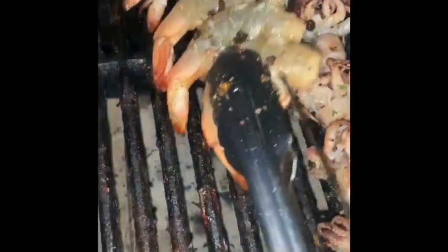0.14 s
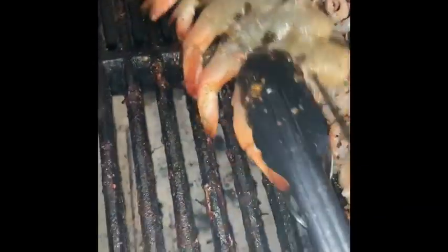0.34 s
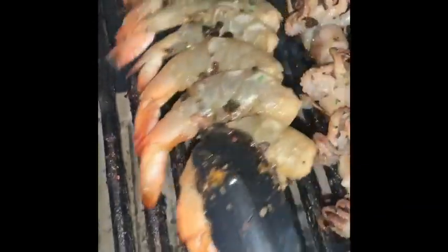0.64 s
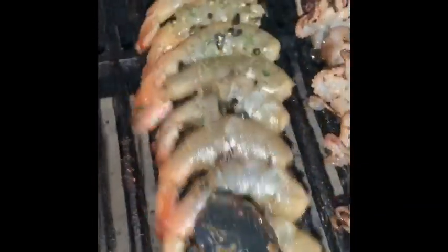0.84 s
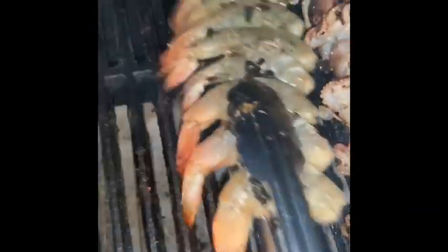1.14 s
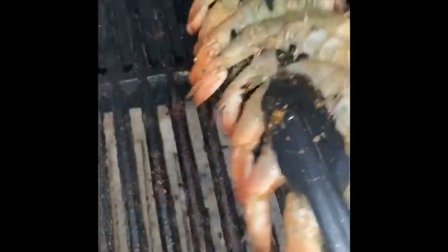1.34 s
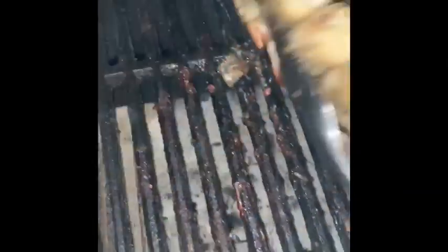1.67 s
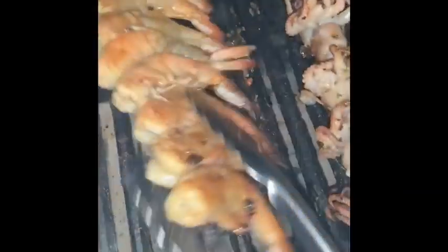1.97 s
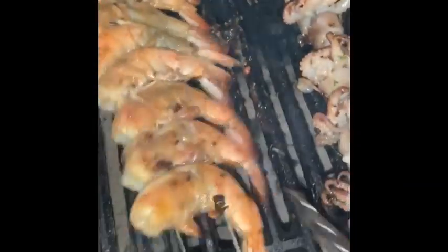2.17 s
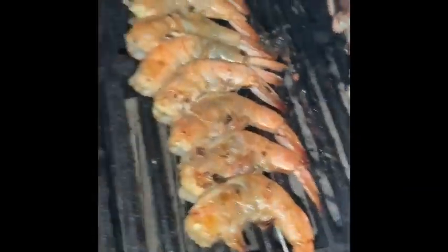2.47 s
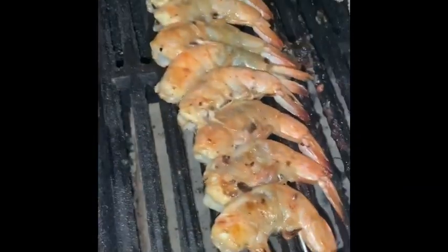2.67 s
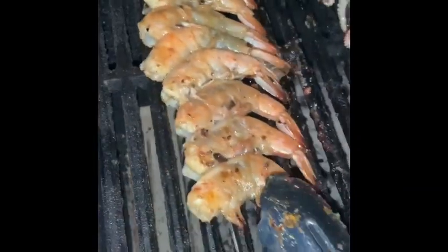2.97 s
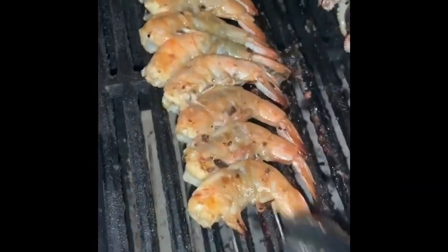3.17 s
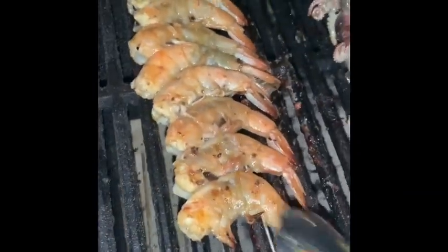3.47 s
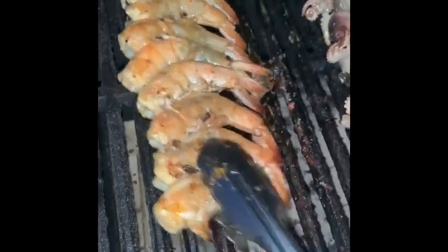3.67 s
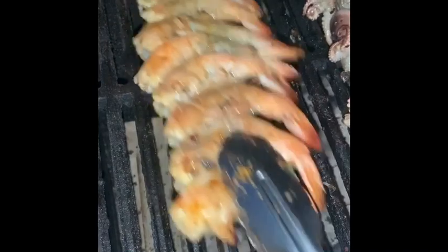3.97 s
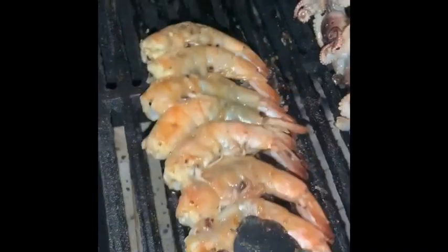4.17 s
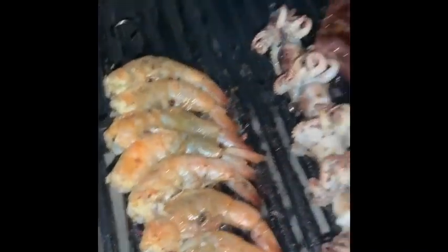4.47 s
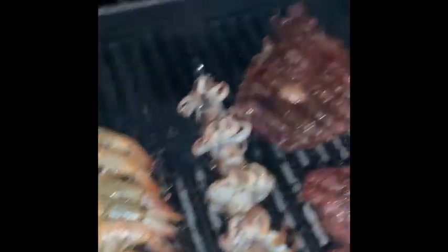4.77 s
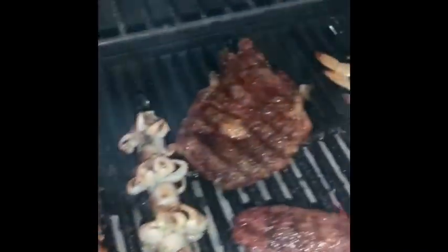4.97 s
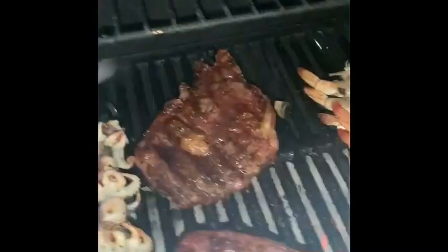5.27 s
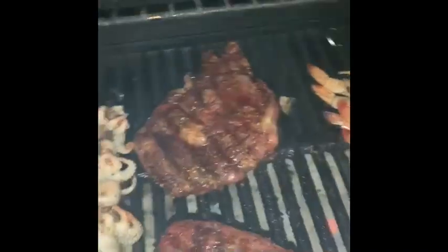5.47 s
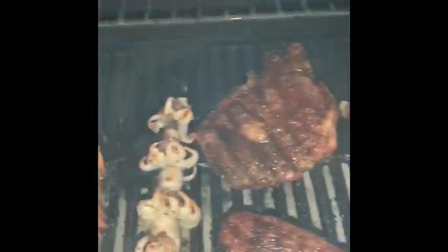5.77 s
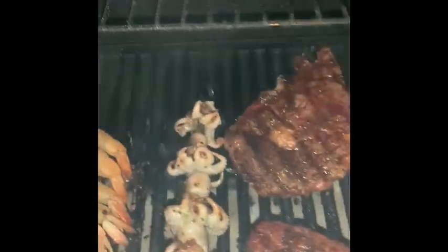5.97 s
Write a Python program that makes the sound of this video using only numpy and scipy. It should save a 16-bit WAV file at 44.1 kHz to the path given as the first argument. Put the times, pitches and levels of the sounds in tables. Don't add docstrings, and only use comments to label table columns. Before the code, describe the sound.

Shrimp and meat sizzle densely on an outdoor grill over low burner rumble and light wind. Steel tongs clack sharply near the start, then scrape and bang the grate, which booms and rings. Busy clatter returns around two seconds and again past three and four, easing into sizzle with one late clang and a final dull knock. Captured close on a phone in stereo, slightly saturated on the hardest hits.

```python
import sys
import numpy as np
from scipy import signal
from scipy.fft import rfft, irfft, next_fast_len
from scipy.io import wavfile
from scipy.ndimage import uniform_filter1d, map_coordinates

SR = 44100
rng = np.random.default_rng(int(sys.argv[2]) if len(sys.argv) > 2 else 0)


def volts_from_db(level):
    exponent = np.asarray(level, float) / 20
    return 10 ** exponent


def transcribe(signal):
    frames = np.atleast_2d(signal).T
    limited = np.clip(frames, -1, 1)
    pcm = np.round(limited * 32767).astype(np.int16)
    wavfile.write(sys.argv[1], SR, pcm)


N = 269773

# (frequency [Hz], level [dB])
WIND = [(22, -36), (38, 4), (55, -4.5), (75, 5.5), (130, -31)]
# (time [s], length [s], level [dB])
GUSTS = [
    (-.1, 0.39, -62),
    (2.01, 0.56, -34),
    (2.76, 0.28, -54),
    (3.3, 0.33, -48),
    (3.556, 0.37, -40),
    (4.2, 0.99, -43),
    (4.982, 0.43, -33),
    (5.14, 0.44, -32),
    (5.425, 0.61, -35),
    (5.988, 0.2, -48),
]
BREEZE_DB, GUST_RISE = -64, 0.14
# (frequency [Hz], level [dB])
RUMBLE = [(50, -59), (80, -14), (110, 3), (160, 6), (220, -15.5), (400, -59)]
# (frequency [Hz], level [dB])
ROAR = [(120, 3.5), (200, -2.5), (320, 4), (550, -3), (800, -1), (1200, -28)]
# (time [s], level [dB])
FLAME = [(0.0, -36), (0.47, -36.5), (0.83, -33.5), (1.74, -37), (2.04, -32), (2.3, -38.5), (2.55, -39),
         (2.73, -34), (3.29, -37.5), (3.49, -36), (3.73, -36.5), (4.46, -41), (5.62, -42), (6.12, -45)]
RUMBLE_DB, RUMBLE_GROWS = -46.5, 0.34
# (time [s], length [s], flutter level [dB], rustle level [dB])
BUFFET = [
    (6.2, .17, -58, -36),
    (5.14, .05, -50, -45),
    (5.19, 0.1, -36.5, -36),
    (4.5, 0.05, -39, -52),
    (1.39, 0.47, -67, -44.5),
    (2.15, 0.18, -35, -44),
    (2.4, 0.091, -50, -28.5),
    (1.9, 0.18, -41, -38.5),
    (4.0, 0.09, -57, -42),
]
# (frequency [Hz], level [dB])
RUSTLE = [(150, -37), (300, -4), (500, 3), (750, -4), (1100, -36)]

# (frequency [Hz], level [dB])
FIZZ = [(1500, -30), (3000, -8.5), (4200, -9.5), (5500, 0.5), (8000, 2), (11000, 3.5), (15700, 5.5)]
# (frequency [Hz], level [dB])
SIMMER = [(300, -81), (700, 1.5), (1200, 2), (2000, 1), (2800, -2), (4000, 4.5), (6000, -20.5)]
# (time [s], level [dB])
BOIL = [(0.0, -28), (0.36, -29.5), (0.66, -26.5), (0.8, -29), (1.04, -28), (1.17, -25.5), (1.48, -30),
        (1.81, -27), (1.91, -30), (2.03, -27.5), (2.45, -24.5), (3.49, -26.5), (3.78, -27), (4.6, -24),
        (4.92, -27), (5.57, -28), (5.98, -30.5), (6.12, -27.5)]
SIMMER_DB, SIMMER_GROWS = -39, 0.54
# (time [s], peak [dB], pitch [Hz])
SPARK = [(.3958, -15, 11000), (1.7357, -11, 6600), (3.695, -6, 12500), (3.7215, -5, 12000),
         (3.8797, -14, 11500), (3.9598, -12, 12000), (4.5455, -6, 11500), (4.5545, -9, 11500),
         (5.209, -16, 11000), (2.409, -14, 10500), (3.473, -9, 5600), (3.508, -8, 6500),
         (5.5243, -16, 10900), (5.6275, -14, 11100), (5.9787, -17, 11100)]
SPARK_S = .00022
# (time [s], peak [dB], t60 [s])
POP = [
    (2.3094, -23, 0.054),
    (2.331, -20, 0.028),
    (2.4527, -16, 0.024),
    (3.9287, -17.5, 0.041),
    (3.98, -24, 0.077),
    (4.009, -22.5, 0.082),
    (4.079, -20, 0.024),
    (5.58, -20, 0.03),
]
POP_HZ, POP_BODY_DB, POP_SNAP_DB = 7100, -7, 4

# (time [s], length [s], level [dB])
DRAG = (0.562, 0.17, -25.5)
# (frequency [Hz], level [dB])
DRAG_BODY = [(200, -30), (330, -5), (430, 9.5), (700, -8.5), (1300, -15), (2300, -5.5), (4500, -13),
             (7000, -29)]
DRAG_LEAD = 1.4

# (frequency [Hz], t60 [s])
GRATE = [
    (148, 0.26),
    (241, 1.8),
    (323, 0.13),
]
# (frequency [Hz], level [dB], t60 [s])
BARS = [(410.6, 11.5, 0.13), (460, 8.5, 0.21), (711, -5, 0.28), (985, 3, 0.38), (561, 1, 0.24),
        (783, 6.5, 0.43), (1143, 6, 0.19), (1364, 9.5, 0.044), (1460, 6, 0.3), (1647, -3, 0.55),
        (2010, 6, 0.22), (2326, 6.5, 0.22)]
# (time [s], boom [dB], hum [dB], drum [dB], clang [dB])
KNOCK = [(0.637, -29.5, -75, -41, -42), (.812, -18.5, -31, -23, -23), (1.12, -30, -42.5, -46, -36),
         (1.898, -24, -50, -61, -49), (2.048, -24, -66, -33, -23), (2.543, -15.5, -37, -28, -33.5),
         (2.657, -15, -31, -18.5, -24), (2.688, -58, -33, -37, -34), (3.29, -21, -28.5, -20.5, -25.5),
         (3.304, -17, -34, -32, -36), (3.45, -36, -58, -53, -50), (3.347, -58, -36, -24.5, -45),
         (3.39, -23, -69, -25, -29.5), (3.47, -45, -64, -28.5, -40), (3.579, -23.5, -61, -32, -57),
         (3.614, -55, -70, -30.5, -50), (3.65, -52, -64, -34, -59), (3.687, -49, -49.5, -48, -58),
         (0.584, -45, -65, -58, -38), (1.957, -28, -62, -27, -37), (4.203, -21.5, -28, -18, -38),
         (6.076, -31, -29, -18, -29)]
# (time [s], level [dB])
MUTE = [
    (3.6, -14.5),
]
# (frequency [Hz], level [dB])
THUMP = [(120, -15), (200, 5.5), (350, -4.5), (600, -11.5), (1000, -8.5), (1800, -18), (3000, -47)]
# (time [s], frequency [Hz], level [dB], t60 [s])
RING = [(.812, 1160, -19, 0.29), (.812, 1380, -23, .1), (.812, 1900, -19, 0.15), (.812, 2342, -33, 0.11),
        (.812, 790, -30, 0.18), (2.062, 368, -17.5, 0.19), (2.655, 1663, -23.5, 0.44),
        (2.655, 367, -19, 0.21), (2.655, 614, -12, 0.12), (2.655, 1990, -30, .25), (2.655, 2330, -20, 0.23),
        (2.69, 690, -30, 0.85), (2.69, 793, -40, .9), (3.293, 430, -30, 0.14), (3.3, 834, -30, 0.45),
        (3.43, 783, -27, 0.53), (3.61, 760, -28, 0.33), (4.203, 1162, -15.5, 0.19),
        (4.203, 1450, -20.5, 0.095), (4.203, 790, -19.5, .12), (4.21, 880, -21.5, 0.2),
        (4.21, 1933, -28, 0.22), (4.22, 659, -36.5, 0.98), (5.325, 1940, -17, 0.14),
        (5.325, 1580, -26, 0.25), (5.325, 1367, -27, 0.16), (5.325, 3488, -19, 0.19),
        (6.073, 335, -8, 0.12), (6.073, 265, -14, 0.13), (3.575, 300, -24, 0.37), (3.655, 440, -32.5, .2),
        (6.08, 885, -19.5, 0.2), (6.08, 1177, -28, 0.29), (6.08, 1660, -21, 0.075),
        (2.7, 1337, -34.5, 0.69), (2.545, 369, -25, 0.18), (2.72, 771, -31.5, .9)]
RING_RISE_S = 0.0033

# (frequency [Hz], width [Hz], level [dB])
TONGS = [(3312, 55, 1), (3580, 300, -0.5), (4376, 250, 8), (5192, 110, 12.5), (5450, 180, 5.5),
         (5750, 200, 3.5), (6110, 91, -1.5), (6600, 45, 3.5), (7410, 98, 1), (7400, 27, -6), (8400, 340, 1)]
# (frequency [Hz], level [dB])
RASP = [(2000, -6), (3300, -3.5), (4450, -10), (5000, -5), (5600, -2.5), (6110, -1.5), (6700, -6),
        (8300, -2), (15000, -1)]
# (frequency [Hz], level [dB])
BODY = [(500, -15.5), (1000, -11.5), (1900, -3), (3000, 0.5), (4500, -2)]
# (time [s], length [s], rasp level [dB], body level [dB])
SCRAPE = [(0.556, 0.26, -45, -25), (0.8, 0.12, -37.5, -20), (1.702, 0.036, -25.5, -49),
          (1.832, 0.037, -21, -39), (1.932, 0.084, -30.5, -50), (2.025, 0.086, -23, -24.5),
          (2.569, 0.071, -28.5, -30), (2.688, 0.073, -30.5, -22), (3.025, 0.11, -24, -72),
          (3.104, 0.093, -22.5, -67), (3.336, 0.12, -23.5, -26.5), (3.449, 0.17, -20.5, -37),
          (4.151, 0.04, -31.5, -50), (4.191, 0.031, -50, -22), (4.253, 0.081, -30, -39),
          (4.316, 0.076, -23, -44), (5.312, 0.03, -38, -29), (5.355, 0.052, -31, -32),
          (1.078, 0.088, -35, -28.5), (0.824, 0.22, -44, -24.5)]
STROKE_RISE, BODY_RISE = 0.41, 0.29
# (time [s], length [s], level [dB], tone [Hz], body level [dB])
SKID = [(0.786, 0.018, -14, 5130, -9), (0.799, 0.018, -17, 3250, 9), (0.806, .013, -12, 5170, 2),
        (1.771, 0.0046, -10, 6670, -14), (1.714, 0.02, -18, 4330, -28), (1.974, .03, -22, 4530, -30),
        (2.0556, 0.038, -17, 5050, -6), (2.523, 0.0071, -14, 7270, -10), (2.643, 0.0076, -21, 5600, 6),
        (2.65, 0.017, -5.5, 6160, -7), (2.681, 0.0052, -16, 7080, -3), (3.1144, 0.019, -14, 4970, -13),
        (3.465, 0.013, -17, 7600, -5), (3.492, 0.015, -12, 5630, -27), (3.519, .007, -5, 7200, -17),
        (3.529, 0.02, -13, 6700, -32), (3.55, 0.03, -16.5, 6060, -32), (4.3204, 0.014, -11, 5240, -28),
        (4.33, 0.004, -9, 5170, -28.5), (4.3498, 0.017, -16, 6500, -16), (4.365, 0.011, -16, 7360, -20),
        (0.617, 0.087, -27, 4770, -20), (0.707, 0.019, -21, 4370, -29), (.789, 0.036, -9, 4510, -18),
        (2.5294, 0.004, -1.5, 9070, -15), (2.53, 0.0076, -11, 4450, -14), (2.687, 0.0066, -12, 11050, -21),
        (3.113, 0.0027, -19, 7160, -18), (3.166, .006, -20, 6000, -18), (4.186, .012, -19.5, 3230, -10),
        (4.262, 0.06, -26, 5270, -25), (4.293, .004, -19, 5250, -20), (4.31, .005, -21, 4500, -20),
        (4.32, .04, -20, 4670, -25), (4.3437, 0.0056, -3.5, 5150, -32), (2.065, 0.0051, -12, 5200, -3),
        (5.338, 0.0029, -16, 7000, -3), (5.319, 0.0051, -16, 6050, -1), (4.371, 0.0069, -17.5, 3000, -13),
        (4.554, 0.0071, -26, 11600, -4)]
SKID_WIDTH_HZ, SKID_TONE_DB, SKID_GRIP_S, SKID_RELEASE_S = 260, 15.5, 0.0002, 0.017
# (time [s], peak [dB], tone [Hz], body level [dB], t60 [s])
CLACK = [(.1127, 7, 5450, -47, 0.059), (.7847, 6, 5330, -44, 0.047), (.8071, 8.5, 3430, -10.5, 0.036),
         (1.0124, -1, 4350, -47, 0.0093), (1.204, -4, 4350, -50, 0.016), (1.2635, 3.5, 7500, -47, 0.01),
         (1.7665, -0.5, 6550, -25, 0.078), (1.7725, -4, 6600, -43, 0.022), (1.8781, -0.5, 7530, -22, 0.029),
         (2.0135, 2.5, 5830, -24, 0.029), (2.0567, 1, 4900, -47, 0.031), (2.0655, 6.5, 5750, -31, 0.035),
         (2.5286, 0.5, 9100, -22, 0.092), (2.6528, 9.5, 6110, -12.5, 0.042), (2.6868, -7, 7100, -7, 0.046),
         (3.2892, 2, 7100, -16, 0.039), (3.3932, -8.5, 6100, -31, 0.021), (3.5198, -23, 7600, -26, 0.068),
         (4.149, -6, 6100, -43, 0.019), (4.1902, -3, 5500, -34, 0.03), (4.3211, -1, 4800, -45, 0.14),
         (4.3464, 2.5, 6700, -47, 0.083), (5.3255, -2, 3420, -2, 0.028), (5.3414, -6.5, 3400, -7.5, 0.091)]
# (time [s], peak [dB], tone [Hz])
RATTLE = [(1.855, -4.5, 3140), (2.0234, -3.5, 6430), (2.0924, -3, 5860), (2.5937, -7, 5550),
          (2.7016, -7, 7240), (3.063, -9, 7100), (3.1244, -4, 7400), (3.167, -7, 5710), (3.456, -29, 5750),
          (3.469, -19, 7800), (3.49, -5, 5450), (4.5458, -12, 7250), (4.7173, -13, 7300),
          (4.9383, -12, 6450), (5.024, -10.5, 6600), (5.0962, -22, 6440)]
RATTLE_BODY_DB, RATTLE_T60_S = -42, 0.052
# (time [s], peak [dB])
NUDGE = [
    (0.413, -23.5),
    (1.0794, -24.5),
    (3.3466, -18),
    (3.632, -25),
    (3.7963, -16.5),
    (5.459, -18.5),
    (6.078, -20.5),
]
NUDGE_HZ, NUDGE_BODY_DB, NUDGE_T60_S = 6700, -4, 0.067
SNAP_DB, SNAP_SHRINKS = -13, 0.51
STRIKE_DB, SOFT_STRIKE_DB = 14, 3
SOFT_BELOW_DB = -7

# (frequency [Hz], lead [radians])
LEAD = [(100, 0), (500, -.9), (900, -1.7), (1250, -.7), (2300, 1.2), (2750, 3), (3200, 1.5), (4000, 2.3),
        (4750, np.pi)]
LEAD_TURN_HZ = 4170
# (frequency [Hz], likeness [0..1])
ALIKE = [(130, 1), (300, 1), (750, 0.13), (1650, 0.39), (2400, 0.25), (3400, 0.62), (4300, 0.96),
         (16000, 0.97)]
CONTACT_ALIKE = 0.83
CONTACT_PATH = 1
# (time [s], length [s], level [dB])
DIP = [
    (0.843, 0.16, -6),
    (5.35, .13, -4),
    (2.5, 0.16, -2),
]
DIP_FALL = 0.32
BAND_EDGES = [64, 72, 80, 88, 96, 108, 120, 132, 144, 160, 176, 196, 216, 240, 264, 292, *range(320, 736, 32),
              768]


def unit(x):
    return x / np.sqrt(np.mean(x ** 2) + 1e-20)


def along(points, hz):
    f, v = np.transpose(points)
    return np.interp(np.log(hz + 1), np.log(f + 1), v)


def curves(rows):
    s, *cols = np.transpose(rows)
    return [np.interp(np.arange(N) / SR, s, c) for c in cols]


def wobble(rate):
    at = np.arange(0, N + 8, 8)
    knots = rng.standard_normal(int(N * rate / SR) + 4)
    smooth = map_coordinates(knots, [at * rate / SR])
    return np.interp(np.arange(N), at, np.clip(smooth, -2.5, 2.5))


def hump(start_s, length_s, rise, peaky):
    out = np.zeros(N + 2 * SR)
    u = np.linspace(0, 1, max(round(length_s * SR), 2))
    rise = np.clip(rise, .05, .95)
    out[SR + round(start_s * SR):][:len(u)] = np.interp(u, [0, rise, 1], [0, 1, 0]) ** peaky
    return out[SR:][:N]


def filtered(x, response):
    m = next_fast_len(x.shape[-1] + 4096)
    return irfft(rfft(x, m) * response(np.fft.rfftfreq(m, 1 / SR)), m)[..., :x.shape[-1]]


def modes(f, table):
    total = 0
    for k, (centre, width, db) in enumerate(table):
        damping = 1j * f * width
        total = total + (-1) ** k * volts_from_db(db) * damping / (centre * centre - f * f + damping + 1e-9)
    return total


def noise(spectrum, grain_db=0, rate=1000):
    rough = rng.standard_normal((2, N)) * volts_from_db(grain_db * wobble(rate))
    return unit(filtered(rough, lambda hz: volts_from_db(along(spectrum, hz))))


def patchy(x, depth_db):
    z = signal.stft(x, nperseg=512)[2]
    field = uniform_filter1d(rng.standard_normal(z.shape[1:]), size=8, axis=0)
    field = uniform_filter1d(field, size=5, axis=1)
    return unit(signal.istft(z * volts_from_db(depth_db * unit(field)), nperseg=512)[1][:, :N])


def burners():
    roar_db, = curves(FLAME)
    rumble_db = RUMBLE_DB + RUMBLE_GROWS * (roar_db - roar_db.mean())
    wind = volts_from_db(BREEZE_DB + 2.9 * wobble(11))
    for s, length, db in GUSTS:
        wind = wind + volts_from_db(db) * hump(s, length, GUST_RISE, peaky=1.16)
    puff, rustle = np.zeros((2, N))
    for s, length, puff_db, rustle_db in BUFFET:
        draught = hump(s, length, .4, peaky=.7)
        puff += volts_from_db(puff_db) * draught
        rustle += volts_from_db(rustle_db) * draught
    flame = puff + volts_from_db(rumble_db + 5.0 + 0.81 * wobble(4.4))
    low = wind * noise(WIND) + flame * noise(RUMBLE)
    low = low + rustle * noise(RUSTLE, grain_db=7.5, rate=40)
    roar = volts_from_db(roar_db + 1.2 * wobble(12) - 0.72) * noise(ROAR)
    return low + roar


def sizzle():
    fizz_db, = curves(BOIL)
    simmer_db = SIMMER_DB + SIMMER_GROWS * (fizz_db - fizz_db.mean())
    when, size = rng.random((2, 2400))
    spits = np.zeros(N)
    spits[(when * N).astype(int)] = volts_from_db(np.minimum(-5.5 * np.log(size), 16))
    spits = np.convolve(spits, volts_from_db(-60 * np.arange(200) / SR / 0.00093))[:N]
    flow = volts_from_db(fizz_db + 5.0 + 0.085 * wobble(17) + 1.07 * wobble(50) + 0.42 * wobble(160))
    fizz = flow * (1 + .3 * spits) * patchy(noise(FIZZ, grain_db=2, rate=900), depth_db=1.3)
    bubbling = patchy(noise(SIMMER, grain_db=0.0, rate=250), depth_db=3.5)
    return fizz + volts_from_db(simmer_db + 1.3 * wobble(16) + 1.12) * bubbling


def sparks():
    out, t = np.zeros((2, N)), np.arange(-40, 40) / SR
    for s, db, hz in SPARK:
        snap = np.exp(-(t / SPARK_S) ** 2) * np.sin(2 * np.pi * hz * t)
        out[0, round(s * SR) - 40:][:80] += volts_from_db(db + 4) * snap
    return out


def drag():
    s, length_s, db = DRAG
    return volts_from_db(db) * hump(s, length_s, 0.51, peaky=0.78) * noise(DRAG_BODY, grain_db=3, rate=200)


def decaying_tone(hz, t60, turns, t):
    return np.exp(-np.log(1000) * t / t60) * np.sin(2 * np.pi * (hz * t + turns))


def knocks():
    out, t = np.zeros(N + 2 * SR), np.arange(SR) / SR
    short = t[:SR // 4]
    decay = volts_from_db(-60 * t / 0.28) + volts_from_db(-19.5 - 60 * t / 0.89)
    swell = 1 - np.exp(-t / .003)
    for s, *low_db, clang_db in KNOCK:
        drift = .0008 * np.cumsum(rng.standard_normal(SR))
        low_db[1] += sum(db * np.clip((s + t - at) / 0.02, 0, 1) * (s < at) for at, db in MUTE)
        boom = 0
        for level, (hz, t60) in zip(low_db, GRATE):
            boom = boom + volts_from_db(level + 3.0) * decaying_tone(hz, t60, hz * s + drift, t)
        clang = np.zeros(SR)
        for hz, level, t60 in BARS:
            gain, pitch = volts_from_db(level + rng.normal(0, 2)), hz * rng.normal(1, .003)
            turns = rng.random() + .0035 * np.cumsum(rng.standard_normal(len(short)))
            clang[:len(short)] += gain * decaying_tone(pitch, t60, turns, short)
        thump = filtered(decay * rng.standard_normal(SR), lambda hz: volts_from_db(along(THUMP, hz)))
        blow = boom + volts_from_db(clang_db - 11.0) * clang + volts_from_db(low_db[2] + 16.5) * thump
        out[round(s * SR):][:SR] += swell * blow
    return out[:N] * volts_from_db(1.9 * wobble(60) + 1.0 * wobble(11)) * [[1], [-.5]]


def rings():
    out, t = np.zeros((2, N + SR)), np.arange(SR // 2) / SR
    for s, hz, db, t60 in RING:
        turns = rng.random() + .002 * np.cumsum(rng.standard_normal(len(t)))
        envelope = volts_from_db(db - 60 * t / t60) * (1 - np.exp(-t / RING_RISE_S))
        out[0, round(s * SR):][:len(t)] += envelope * np.sin(2 * np.pi * (hz * t + turns))
    return out[:, :N]


def steel(hz):
    return modes(hz, TONGS) + 0.55 * hz / (hz + 3000)


def scrapes():
    rasp, body = np.zeros((2, N))
    for s, length, rasp_db, body_db in SCRAPE:
        rasp += volts_from_db(rasp_db + 6.5) * hump(s, length, STROKE_RISE, peaky=0.47)
        body += volts_from_db(body_db - 5.5) * hump(s, length, BODY_RISE, peaky=1.0)
    slips = volts_from_db(3.5 * wobble(220) + 1.5 * wobble(60))
    chatter = slips * rng.standard_normal((2, N))
    bright = unit(filtered(chatter, lambda hz: steel(hz) * volts_from_db(along(RASP, hz))))
    bars = [(hz, 60, db) for hz, db, t60 in BARS]
    thick = filtered(slips * (noise(BODY) + 0.14 * noise(THUMP)), lambda hz: 0.18 + modes(hz, bars))
    return rasp * bright + body * unit(thick)


def skids():
    out, t = np.zeros((2, N + SR)), np.arange(SR // 10) / SR
    for s, length_s, db, tone_hz, body_db in SKID:
        release = volts_from_db(-60 * np.maximum(t - length_s, 0) / SKID_RELEASE_S)
        grip = (1 - np.exp(-t / SKID_GRIP_S)) * release
        chatter = volts_from_db(3.6 * uniform_filter1d(rng.standard_normal(len(t)), size=40) * np.sqrt(40))

        def colour(hz):
            metal = 0.36 * steel(hz) * volts_from_db(along(RASP, hz))
            tone = modes(hz, [(tone_hz, SKID_WIDTH_HZ, SKID_TONE_DB)])
            return metal + tone + volts_from_db(body_db + 8 + along(BODY, hz)) / (1 + (hz / 4500) ** 4)

        skid = filtered(grip * chatter * rng.standard_normal((2, len(t))), colour)
        out[:, round(s * SR):][:, :len(t)] += volts_from_db(db - 5.5) * skid
    return out[:, :N]


def clacks():
    out, t = np.zeros((2, N + SR)), np.arange(SR // 9) / SR
    metal = list(CLACK)
    metal += [(*row, RATTLE_BODY_DB, RATTLE_T60_S) for row in RATTLE]
    metal += [(*row, NUDGE_HZ, NUDGE_BODY_DB, NUDGE_T60_S) for row in NUDGE]
    contacts = [(*row, SNAP_DB - SNAP_SHRINKS * row[1]) for row in metal]
    contacts += [(s, db, POP_HZ, POP_BODY_DB, t60, POP_SNAP_DB) for s, db, t60 in POP]
    for s, db, tone_hz, body_db, t60, snap_db in contacts:
        hard = db > SOFT_BELOW_DB
        fade = -60 * t / np.clip(t60, .003, .3)
        swell = 1 - np.exp(-t / (0.054 * t60))
        edge = volts_from_db(-60 * t / .008) * (1 - np.exp(-t / .0003))
        shape = 1.3 * volts_from_db(fade) * swell + (.7 if hard else .3) * edge
        burst, thick, thin = rng.standard_normal((3, 2, len(t))) * shape * volts_from_db(-1.5)
        strike = volts_from_db(STRIKE_DB if hard else SOFT_STRIKE_DB) * (np.arange(len(t)) == 8) * [[1], [0]]
        burst, thick, thin = burst + strike, thick + strike, thin + strike
        ring = filtered(burst, lambda hz: steel(hz) / (1 + (hz / 9000) ** 4) + modes(hz, [(tone_hz, 120, 8)]))
        low = filtered(thick, lambda hz: volts_from_db(along(BODY, hz)) * (0.54 + modes(hz, [(1660, 570, 0.93)])))
        snap = filtered(thin * volts_from_db(0.26 * fade), lambda hz: 1 / (1 + (7500 / (hz + 1)) ** 4))
        contact = volts_from_db(-3.0) * ring + volts_from_db(body_db + 10.0) * low + volts_from_db(snap_db + 10.5) * snap
        out[:, round(s * SR) - 8:][:, :len(t)] += volts_from_db(db) * contact
    return out[:, :N]


def ports(pair, closeness, path):
    def lead(hz):
        top, turn = LEAD[-1]
        return np.where(hz < top, along(LEAD, hz), turn + 2 * np.pi * (hz - top) / LEAD_TURN_HZ)

    def split(hz):
        angle = np.arccos(np.clip(closeness * along(ALIKE, hz), 0, 1)) / 2
        return np.array([np.cos(angle), np.sin(angle)])

    same, differ = filtered(pair, split)
    sides = np.array([same + differ, same - differ])
    return filtered(sides, lambda hz: np.exp(.5j * path * lead(hz) * [[1], [-1]]))


def scene():
    spread = burners() + sizzle() + sparks() + knocks() + rings() + scrapes()
    aside = ports(drag(), 1, DRAG_LEAD)
    near = ports(skids() + clacks(), CONTACT_ALIKE, CONTACT_PATH)
    return ports(spread, 0.97, 1) + aside + near


def gain_control(x):
    return x * volts_from_db(sum(db * hump(s, length, DIP_FALL, peaky=0.44) for s, length, db in DIP))


def joint(x, weak_db, attack_db, blur, coarse):
    hop = 1024
    n, k = np.arange(2 * hop), np.arange(hop)
    basis = np.cos(np.pi / hop * np.outer(n + .5 + hop / 2, k + .5)) * np.sqrt(2 / hop)
    basis *= signal.windows.kaiser_bessel_derived(2 * hop, 4 * np.pi)[:, None]
    start = 2 * hop - 855
    pair = np.pad([x[0] + x[1], x[0] - x[1]], ((0, 0), (start, 3 * hop - (start + N) % hop)))
    halves = pair.reshape(2, -1, hop)
    bins = np.concatenate([halves[:, :-1], halves[:, 1:]], axis=2) @ basis
    blocks = (np.diff(pair, prepend=0) ** 2).sum(axis=0).reshape(-1, 128).sum(axis=1)
    jump = blocks / (uniform_filter1d(blocks, size=8, origin=3) + 1e-9)
    sharpest = np.roll(jump, -4)[:-8].reshape(-1, 8).max(axis=1)
    steady, calm = sharpest < volts_from_db(attack_db), sharpest < volts_from_db(attack_db - 3)
    for lo, hi in zip(BAND_EDGES, BAND_EDGES[1:]):
        wavers = lo < 240
        limit_db = weak_db + wavers * 2.5 * uniform_filter1d(rng.normal(0, 2, len(steady)), size=4)
        power = (bins[..., lo:hi] ** 2).sum(axis=2)
        weaker = power < power[::-1] * volts_from_db(2 * limit_db)
        bins[..., lo:hi] *= ~(weaker & steady)[..., None]
        step = np.sqrt(power.max(axis=0) / (hi - lo)) * (coarse if wavers else coarse / 3)
        step = step * volts_from_db(limit_db - weak_db)
        bins[..., lo:hi] *= np.abs(bins[..., lo:hi]) > step[:, None]
    flips = rng.random(bins[1, :, 216:].shape) < blur * calm[:, None]
    bins[1, :, 216:] *= np.where(flips, -1, 1)
    frames = bins @ basis.T
    out = frames[:, 1:, :hop] + frames[:, :-1, hop:]
    total, differ = out.reshape(2, -1)[:, start - hop:][:, :N] / 2
    return np.array([total + differ, total - differ])


def low_pass(x):
    return signal.sosfilt(signal.butter(12, 16330, fs=SR, output="sos"), x)


def record(dry):
    x = filtered(dry, lambda hz: np.where(hz < 15760, 1, volts_from_db(-60)) / (1 + (34 / (hz + 1)) ** 4))
    x = gain_control(x)
    x = x / (1 + np.abs(x / 1.1) ** 4) ** (1 / 4)
    return low_pass(x)


dry = scene()
out = record(dry)
transcribe(out)
```